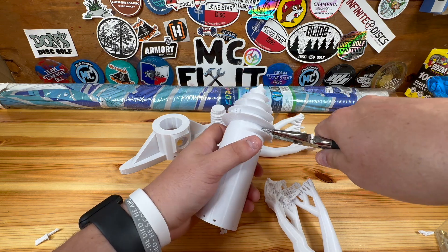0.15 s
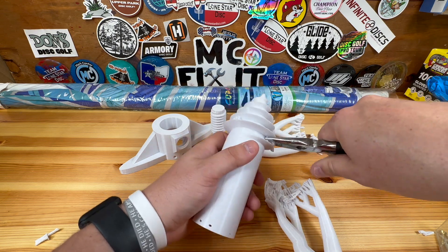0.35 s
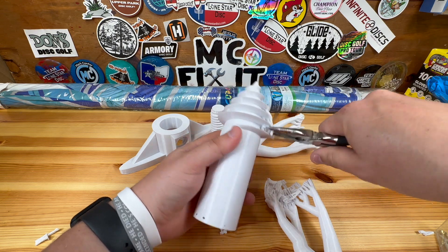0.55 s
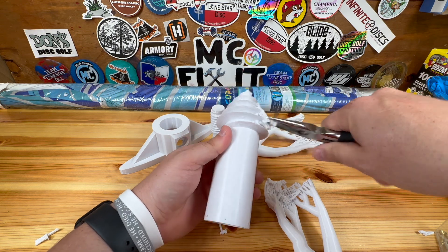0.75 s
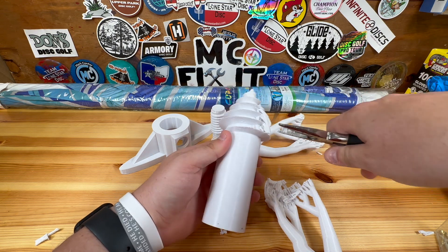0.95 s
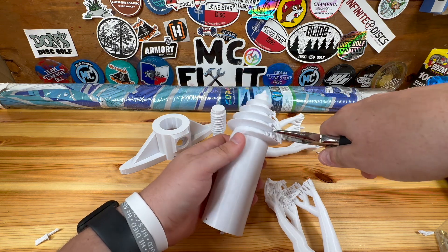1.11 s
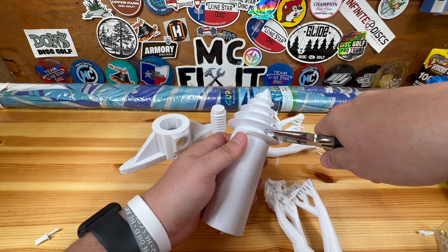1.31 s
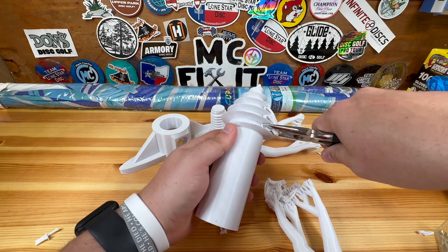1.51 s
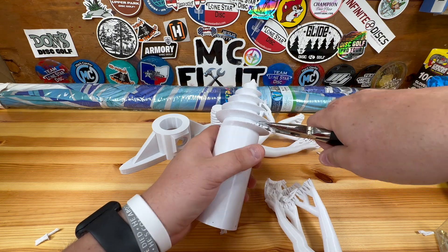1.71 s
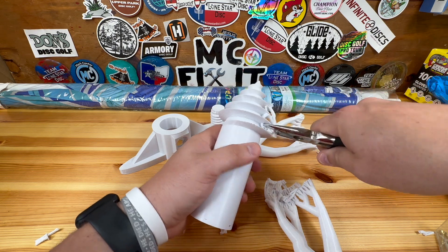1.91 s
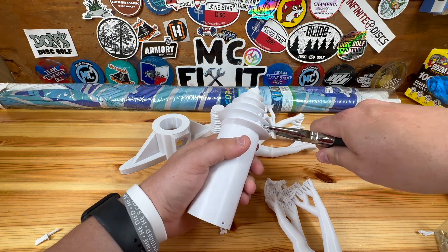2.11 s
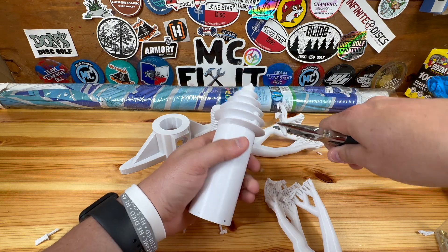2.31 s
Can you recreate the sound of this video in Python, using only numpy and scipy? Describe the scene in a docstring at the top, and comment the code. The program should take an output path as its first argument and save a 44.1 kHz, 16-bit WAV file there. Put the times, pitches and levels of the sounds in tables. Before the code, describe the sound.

Sharp plastic cracking as pliers break stiff supports from a hollow tube, over faint room hum

```python
"""Low room air, a faint wavering hum and a soft rustle of hands and loose struts run throughout, while
pliers grip, twist and snap brittle plastic struts off a hollow printed tube over a wooden bench.
Each crack is a short volley of tiny fractures ringing the tube's stiff walls, while a soft push sets
its air column and the bench going. Hiss, grains and ticks form the rustle; filtered noise is the air,
a wavering sine is the hum, and dying noise sprays are the reflections of the small room."""
import sys
import numpy as np
from scipy import signal
from scipy.fft import rfft, irfft
from scipy.io import wavfile
from scipy.ndimage import uniform_filter1d, map_coordinates

SR = 44100
rng = np.random.default_rng(int(sys.argv[2]) if len(sys.argv) > 2 else 0)


def generate_wav(sig):
    """Save sig (samples, or channels by samples) to the path in sys.argv[1] as 16-bit PCM at SR."""
    pcm = np.round(np.clip(np.atleast_2d(sig).T, -1, 1) * 32767).astype(np.int16)
    wavfile.write(sys.argv[1], SR, pcm)


N = 108045  # samples

# Spectrum of the room air: pitch_hz, relative density_db
AIR_SPECTRUM = [(21, -26), (35, -9.5), (60, -2), (128, -2.5), (240, -11.5), (330, -6.5), (420, -9.5),
                (582, -12), (654, -21), (1170, -25), (1390, -52), (1530, -26.5), (2300, -36.5), (2800, -33),
                (3600, -40), (4680, -56), (7920, -120)]
# Level of the machine hum over time: time_s, level_db
HUM_LEVEL = [(0.0, -57), (0.05, -48.5), (0.16, -70), (0.2, -54.5), (0.76, -60.5), (0.84, -45), (0.95, -70),
             (1.23, -56.5), (1.26, -48.5), (1.43, -67), (1.47, -51), (1.61, -61), (2.02, -56.5),
             (2.45, -59)]
# Level of the rustle over time: time_s, level_db
RUSTLE_LEVEL = [(0, -66.5), (0.06, -69.5), (0.11, -84), (0.175, -88), (0.19, -51), (0.29, -55.5),
                (0.36, -41), (0.42, -44), (0.45, -50), (0.51, -59), (0.55, -48), (0.6, -57), (0.67, -65),
                (0.73, -55), (0.77, -51.5), (0.83, -71), (0.88, -85), (0.965, -79), (0.99, -63.5),
                (1.02, -68), (1.05, -69), (1.13, -65.5), (1.16, -53), (1.19, -48), (1.24, -77),
                (1.285, -59), (1.31, -57), (1.345, -64), (1.39, -43), (1.42, -47), (1.48, -62), (1.53, -58),
                (1.56, -43.5), (1.64, -50), (1.72, -64), (1.76, -58.5), (1.79, -40.5), (1.87, -66),
                (1.92, -45.5), (1.97, -38.5), (2.03, -55), (2.1, -60.5), (2.125, -48), (2.155, -47.5),
                (2.175, -45), (2.195, -51), (2.23, -58.5), (2.3, -65), (2.33, -54.5), (2.41, -76),
                (2.445, -62)]
# Spectrum of the rustling hiss: pitch_hz, relative density_db
RUSTLE_SPECTRUM = [(530, -47), (900, -24.5), (1400, -10.5), (2160, -6), (2970, -6.5), (3750, -5.5),
                   (4090, -4), (6470, -6), (9800, -7.5), (11000, -22.5), (12200, -44), (15000, -80.5),
                   (22000, -120)]
# Cracks, ticks and knocks; the levels are relative, before the trims of each part: start_s,
# snap_db (5.6-7.4 kHz), thud_db (bench), tube_db (air column), low_db (1.2-2.1 kHz),
# mid_db (2-3.1 kHz), high_db (3.8-5.1 kHz), top_db (7.9-10.1 kHz), left_over_right_db, volley_ms
CRACK_EVENTS = [(0.051, -65, -42.5, -50, -60, -90, -72, -73.5, 3.5, 4.7),
                (0.183, -50.5, -70, -44, -39, -61.5, -46.5, -50.5, 1, 0.94),
                (0.201, -48.5, -51.5, -37.5, -59.5, -52, -46.5, -54, 9, 1.3),
                (0.2199, -24, -35, -20.5, -26.5, -32.5, -29.5, -24.5, 1.5, 3.3),
                (0.324, -16, -37, -28, -24.5, -26.5, -23, -18.5, 3.5, 2.7),
                (0.3305, -40.5, -52.5, -35.5, -31.5, -34, -25.5, -35, 2.5, 1.5),
                (0.3736, -25, -33.5, -30, -27.5, -29, -27.5, -17, 4, 2.8),
                (0.379, -18.5, -34.5, -31.5, -27, -23.5, -21, -20, 0, 3),
                (0.3871, -39, -33, -35, -40.5, -52, -38, -55, 11, 3.9),
                (0.3995, -43.5, -56, -41.5, -45, -52, -45.5, -51, -0.5, 3),
                (0.421, -38.5, -67, -66, -56, -69, -51, -52, 10, 1.7),
                (0.4577, -35.5, -69, -66, -53, -64, -49.5, -43, 2, 0.96),
                (0.468, -47, -74, -60, -56, -61, -43.5, -45, -5, 0.99),
                (0.486, -42, -74, -57.5, -56, -52.5, -49, -44, 6.5, 1.7),
                (0.524, -49, -48, -56, -68, -55, -56, -47, -4, 1.1),
                (0.534, -36, -55, -57, -51, -44, -37.5, -34, -2, 2.2),
                (0.5416, -35, -68, -52, -64, -50, -38.5, -42.5, 3.5, 2.5),
                (0.559, -40.5, -45.5, -60, -66, -51, -42.5, -58, 2, 1.7),
                (0.587, -48.5, -52, -59, -75, -56, -48, -52.5, 6, 1.7),
                (0.7571, -47, -44, -54, -53.5, -46.5, -51.5, -59, 0, 4.4),
                (0.974, -49, -64, -69, -59, -48.5, -49, -48, 0, 2.7),
                (1.027, -55, -35.5, -49, -63, -51.5, -64, -62, -1, 3),
                (1.0445, -45.5, -64, -59, -86, -38.5, -44.5, -47.5, 3, 3.1),
                (1.0535, -64, -68, -45.5, -84, -49, -76, -76, -2, 1.1),
                (1.065, -44, -65, -85, -47, -44.5, -53, -55, -3, 1.15),
                (1.099, -56, -76, -73, -66, -51, -53, -67, -2, 2.5),
                (1.1445, -47.5, -59, -52.5, -66, -53.5, -70, -60.5, 1.5, 1.5),
                (1.154, -47, -74, -53, -75, -57, -54.5, -57, 2, 2.3),
                (1.169, -48, -69, -54, -64, -43.5, -57, -60, 3, 2.6),
                (1.1725, -50, -35.5, -44, -57, -44.5, -63, -47, 0, 1.5),
                (1.198, -44, -39, -36, -45, -46.5, -45, -53, 3, 4.1),
                (1.2355, -78, -61, -66.5, -85, -53.5, -76.5, -79, -3, 1.9),
                (1.296, -57, -65, -73, -51, -54, -57, -55.5, -1.5, 1.8),
                (1.306, -47, -75, -57.5, -50, -54, -47, -49.5, 2, 2.9),
                (1.316, -45.5, -61, -76, -57, -52, -46.5, -51, 1, 1.9),
                (1.3507, -38.5, -69, -52, -50, -46, -50, -39, 0.5, 1),
                (1.364, -57, -55, -50, -49.5, -52.5, -52, -52, -2, 5.5),
                (1.372, -26, -77, -47, -49.5, -36.5, -50, -36, -1, 1.5),
                (1.3765, -58, -44, -34.5, -63, -64, -61, -57, 4.5, 2.7),
                (1.387, -57, -75, -56, -40, -47, -41, -40, -3, 3.6),
                (1.3967, -29, -61, -40.5, -41.5, -37.5, -32, -27, 0, 1.7),
                (1.4105, -51.5, -65, -44, -61, -43.5, -49, -55, 4, 1.5),
                (1.421, -24.5, -38, -39, -48, -39, -33, -32, 9.5, 1.7),
                (1.4294, -26, -61, -42, -41, -29.5, -31.5, -24, -11.5, 2.9),
                (1.436, -16.5, -32, -28.5, -26.5, -21.5, -21.5, -24, 3, 1.9),
                (1.4415, -41, -41, -41.5, -55, -48, -37, -50, 9, 2.1),
                (1.446, -50, -47, -35.5, -54, -45, -45, -50, -12, 1.7),
                (1.4515, -49, -56, -55, -66, -52, -55, -59, 0, 1.4),
                (1.5433, -43, -69, -83, -69, -61, -56, -46.5, 5, 2.1),
                (1.5798, -19.5, -38, -27, -29.5, -19, -19, -21, -0.5, 2.53),
                (1.584, -22, -61, -39, -26.5, -34, -32.5, -43, 7.5, 2.14),
                (1.771, -29.5, -66, -40.5, -41.5, -42, -58, -29, -0.5, 1.54),
                (1.782, -38, -67, -51, -50, -43, -38, -42, 9.5, 1.4),
                (1.8072, -18.5, -47, -32, -26.5, -32, -29, -29.5, 1.5, 2.7),
                (1.8161, -20.5, -36, -18.5, -30, -22, -22.5, -28.5, -0.5, 2.17),
                (1.841, -30.5, -69, -70, -58, -38, -34, -33.5, 2, 1.1),
                (1.8525, -41, -61, -42, -70, -56, -53, -46, 9, 2),
                (1.929, -18.5, -36, -24, -22.5, -27, -31, -21.5, 3, 1.7),
                (1.9464, -23, -28.5, -23.5, -43, -25.5, -26, -22, 2, 1.66),
                (1.955, -28, -35, -45, -67, -39, -34, -37, 3, 4.9),
                (1.9792, -33, -44, -70, -52, -48, -33.5, -36, 5.5, 1.7),
                (1.9854, -30, -41, -35, -50, -38, -44, -27.5, 0, 1.9),
                (2.111, -52.5, -63, -63, -73, -72, -73, -59, 9, 2.5),
                (2.1316, -36, -59, -58, -73, -51, -41.5, -44, -1, 2.3),
                (2.145, -32, -71, -65, -63.5, -47, -35.5, -39, 3, 3),
                (2.1531, -45, -61, -77.5, -61, -48, -38, -41, -6, 4.3),
                (2.1615, -32.5, -72, -67, -61, -44, -35.5, -45, 8.5, 3.1),
                (2.1675, -52, -78, -70, -73, -67, -45.5, -48, 11, 3.7),
                (2.1795, -34.5, -70, -58, -54.5, -45, -36, -41.5, 1, 3.7),
                (2.186, -38.5, -68, -67, -61, -41, -38, -48, 13, 2),
                (2.2038, -44, -73, -59.5, -41.5, -45, -38, -40.5, -3.5, 2),
                (2.243, -57, -65, -56, -56, -54, -67, -56.5, 4.5, 2.8),
                (2.314, -49.5, -52, -61, -56.5, -51.5, -52, -52.5, 4, 1.7),
                (2.347, -57, -79, -61, -65, -59, -54, -58, 5, 2.9),
                (2.4225, -42.5, -71, -71, -59, -47.5, -43, -42, 3, 1.7)]
# How the hand holds the tube, each row until the next: from_s, air_pitch_hz, air_ring_length_share,
# lowest_wall_mode_hz, wall_ring_db (for the bands that start under GRIP_UNDER_HZ)
HAND_GRIP = [(0, 693, 0.76, 1350, 3), (.3, 707, 2.3, 1358, -6), (.36, 720.4, 1.03, 1364, -7),
             (.44, 708, 0.88, 1410, -2), (1.0, 690, 0.66, 1307, 11), (1.19, 704, 0.67, 1356, 3),
             (1.34, 685, 1, 1427, 5), (1.376, 540, 0.1, 1420, -3), (1.384, 719, 0.59, 1322, 12),
             (1.425, 695, 0.63, 1840, -3.5), (1.5, 669, 0.44, 1327, -11), (1.7, 726.5, 0.79, 1340, -6),
             (1.9, 650, 0.31, 1323, -7), (1.94, 714, 0.6, 1320, -11), (1.97, 641, 1.1, 1235, -4),
             (2.2, 681, 2.4, 1373, 7), (2.23, 684, 1, 1330, -4)]
# Air column at rest, retuned by the grip in a crack: pitch_hz, relative level_db, t60_s
AIR_MODES = [(718.5, 7, 0.062), (639, -13, 0.058), (488.5, -28, 0.15)]
# Wall modes before detuning (the grip sets the first pitch): pitch_hz, relative level_db, t60_s
WALL_MODES = [(1337.5, -9, 0.088), (1660, -20.5, 0.032), (2330, -4.5, 0.011), (2880, -16, .015),
              (4605, -12.5, 0.015), (5820, -7.5, 0.0071), (6592, -10, 0.018), (6910, -9.5, 0.0046),
              (8190, -16, 0.026), (9300, -14.5, 0.0075), (9730, -14.5, 0.0091)]
# Bench modes: pitch_hz, relative level_db, t60_s
BENCH_MODES = [(318.7, 0, 0.043), (223, -7.5, 0.019), (110, -17.5, 0.042), (67, -8, 0.09)]
# Bands the fractures sound in, lowest first: low_hz, high_hz, gain_db
FRACTURE_BANDS = [(1178, 2060, 6.5), (1960, 3100, 2), (3766, 5096, 1), (5630, 7360, 1), (7900, 10140, 3.5)]
# Dull knock added at the level of the low band: low_hz, high_hz, gain_db
DULL_KNOCK = (417, 1037, -2.8)
# Low reflections of each crack: low_hz, high_hz, level_db, t60_s
LOW_REFLECTIONS = (180, 1900.5, -14.5, 0.09)

AIR_DB, AIR_SIDE, AIR_LEFT_OVER_RIGHT_DB = -56.5, 0.7, 1
HUM_HZ, HUM_WIDTH_HZ = 146.3, 10.2
RUSTLE_FLICKER_DB, RUSTLE_SIDE = 0.5, 0.56
RUSTLE_TUBE_DB = -11  # rubbing also stirs the air in the tube
TICKS_PER_S, TICKS_DB = 500, -8  # loose struts tick within the rustle
CRACK_SPAN = int(SR / 10)  # samples
FRACTURES_PER_S, SCATTER_DB = 6000, 4
ATTACK_MS, ATTACK_SHARE, RELEASE_MS = 0.61, 0.24, 1.7  # longer volleys also swell more slowly
PUSH_MS, PUSH_LATE_MS = 0.39, 2.885
AFTER_DB, AFTER_MS = -14.5, 3.9  # small after-shocks keep jolting the air and the bench
TUBE_TRIM_DB, BENCH_TRIM_DB = 7.5, 2.5
DETUNE = 0.026  # each piece breaks with its wall modes shifted by about this share
MODE_SPREAD_DB, GRIP_UNDER_HZ = 4.5, 3000
NEAR_DB, NEAR_T60_S, NEAR_ABOVE_HZ = -1, 0.029, 2100  # bench and wall reflections
ROOM_DB, ROOM_T60_S, ROOM_ABOVE_HZ = -13.5, 0.13, 1730
RIGHT_LATE_MS = 0.157
CEILING, TOP_HZ = 0.85, 13000


def undb(db):
    """Decibels express amplitude ratios on a logarithmic scale."""
    return 10 ** (np.asarray(db, float) / 20)


def unit(x):
    """Dividing by the root mean square gives a signal unit power."""
    return x / np.sqrt(np.mean(x ** 2))


def band(x, lo_hz, hi_hz):
    """A band-pass filter keeps the energy between two pitches."""
    return signal.sosfilt(signal.butter(2, [lo_hz, hi_hz], "band", fs=SR, output="sos"), x)


def curve(table):
    """Linear interpolation joins (time, level) points into a contour."""
    return np.interp(np.arange(N) / SR, *np.array(table, float).T)


def coloured(table):
    """Spectral shaping: white noise weighted along (pitch, density) points, at unit power."""
    hz, db = np.array(table, float).T
    f = np.fft.rfftfreq(N, 1 / SR) + 1
    weight = undb(np.interp(np.log(f), np.log(hz), db, -60, -60))
    return unit(irfft(rfft(rng.standard_normal(N)) * weight, N))


def walk(rate):
    """Random modulation: levels drawn at a given rate per second, joined by slopes; spread 1."""
    k = int(SR / rate)
    steps = np.repeat(rng.standard_normal(N // k + 1), k)
    return unit(uniform_filter1d(steps, k)[:N])


def rings(x, modes):
    """Modal superposition: damped resonators, each passing about the power of unit noise."""
    out = 0
    for hz, db, t60 in modes:
        r = 10 ** (-60 / 20 / (t60 * SR))
        poles = [1, -2 * r * np.cos(2 * np.pi * hz / SR), r * r]
        out = out + undb(db) * np.sqrt(1 - r) * signal.lfilter([1, 0, -1], poles, x) / 2
    return out


def echoes(x, db, t60, above_hz, under_hz=10950):
    """Diffuse reflection: a dying spray of band-limited noise, different left and right."""
    t = np.arange(min(SR // 2, x.shape[1])) / SR
    tail = band(rng.standard_normal((2, len(t))), above_hz, under_hz) * undb(-60 * t / t60)
    tail = tail / np.sqrt(np.sum(tail ** 2, axis=1, keepdims=True))
    return undb(db) * signal.fftconvolve(x, tail, axes=1)[:, :x.shape[1]]


def background():
    """Broadband noise with a wide stereo part makes the air; frequency modulation wavers the hum."""
    air = coloured(AIR_SPECTRUM) + AIR_SIDE * coloured(AIR_SPECTRUM) * np.array([[1], [-1]])
    balance_db = AIR_LEFT_OVER_RIGHT_DB * np.array([[.5], [-.5]])
    pitch_hz = HUM_HZ + HUM_WIDTH_HZ / 2 * walk(8.1)
    hum = np.sqrt(2) * np.sin(2 * np.pi * np.cumsum(pitch_hz) / SR)
    return undb(AIR_DB + balance_db) * air + undb(curve(HUM_LEVEL)) * hum


def rustle():
    """Friction: skin and struts on plastic give a grainy, partly shared hiss with scattered ticks."""
    grains = undb(RUSTLE_FLICKER_DB * (walk(45) + walk(400)))
    strikes = (rng.random(N) < TICKS_PER_S / SR) * rng.exponential(size=N) ** 1.9
    ticks = signal.lfilter([1], [1, -.95], strikes)
    shape = unit(grains) + undb(TICKS_DB) * unit(ticks)
    sides = np.array([coloured(RUSTLE_SPECTRUM), coloured(RUSTLE_SPECTRUM)])
    hiss = coloured(RUSTLE_SPECTRUM) + RUSTLE_SIDE * sides
    stir = rng.standard_normal((2, N)) + rng.standard_normal(N)
    hiss = hiss + undb(RUSTLE_TUBE_DB) * unit(rings(stir, AIR_MODES))
    return undb(curve(RUSTLE_LEVEL)) * unit(shape * hiss)


def soft_push(ms):
    """Impulsive forcing: a smooth late pulse, then random after-shocks that die away."""
    soft = np.exp(-((ms - PUSH_LATE_MS) / PUSH_MS) ** 2)
    shocks = np.exp(-ms / AFTER_MS) * rng.standard_normal(CRACK_SPAN)
    after = signal.fftconvolve(soft, shocks)[:CRACK_SPAN]
    return soft + undb(AFTER_DB) * after / np.abs(after).max()


def pushed_body(push, modes):
    """Modal excitation: a push sets a body's modes ringing in varying proportion; peak 1."""
    # each mode after the first gets a random strength in every push
    spread = MODE_SPREAD_DB * rng.standard_normal(len(modes)) * (np.arange(len(modes)) > 0)
    x = rings(push, [(hz, db + s, t60) for (hz, db, t60), s in zip(modes, spread)])
    return x / np.abs(x).max()


def fracture_volley(ms, volley_ms):
    """Brittle fracture: random impulses of either sign under a rising, then dying envelope."""
    rise = np.minimum(ms / (ATTACK_MS + ATTACK_SHARE * volley_ms), 1)
    env = rise * np.exp(-np.maximum(ms - volley_ms, 0) / RELEASE_MS)
    breaks = rng.random(CRACK_SPAN) < FRACTURES_PER_S / SR
    size = undb(-SCATTER_DB * np.log(rng.random(CRACK_SPAN)))
    return env * breaks * size * np.sign(rng.standard_normal(CRACK_SPAN)), np.sqrt(np.mean(env ** 2))


def wall_sound(volley, env_rms, band_levels, wall_hz, ring_db):
    """Plate resonance: the volley and its wall ringing, levelled band by band, over a dull knock."""
    shift = rng.standard_normal(len(WALL_MODES))
    wall = [(hz * (1 + DETUNE * s), db, t60) for (hz, db, t60), s in zip(WALL_MODES, shift)]
    wall[0] = (wall_hz, *WALL_MODES[0][1:])
    knock_lo, knock_hi, knock_db = DULL_KNOCK
    sound = undb(band_levels[0] + knock_db) * unit(band(volley, knock_lo, knock_hi)) * env_rms
    for level_db, (lo, hi, gain_db) in zip(band_levels, FRACTURE_BANDS):
        grip_db = ring_db * (lo < GRIP_UNDER_HZ)
        modes = [(hz, db + grip_db, t60) for (hz, db, t60), rest in zip(wall, WALL_MODES)
                 if lo < rest[0] <= hi]
        ringing = band(volley + rings(volley, modes), lo, hi)
        sound = sound + undb(level_db + gain_db) * unit(ringing) * env_rms
    return sound


def cracks():
    """Modal resonance: fractures ring the walls as a soft push drives the tube's air and the bench."""
    ms = np.arange(CRACK_SPAN) * 1000 / SR
    low_hz, high_hz, reflect_db, reflect_t60 = LOW_REFLECTIONS
    out = np.zeros((2, N + CRACK_SPAN))
    for t, snap_db, thud_db, tube_db, low_db, mid_db, high_db, top_db, pan_db, volley_ms in CRACK_EVENTS:
        _, air_hz, share, wall_hz, ring_db = [g for g in HAND_GRIP if g[0] <= t][-1]
        push = soft_push(ms)
        air = [(hz * air_hz / AIR_MODES[0][0], db, t60 * share) for hz, db, t60 in AIR_MODES]
        sound = undb(TUBE_TRIM_DB + tube_db) * pushed_body(push, air)
        sound = sound + undb(BENCH_TRIM_DB + thud_db) * pushed_body(push, BENCH_MODES)
        volley, env_rms = fracture_volley(ms, volley_ms)
        band_levels = (low_db, mid_db, high_db, snap_db, top_db)
        sound = sound + wall_sound(volley, env_rms, band_levels, wall_hz, ring_db)
        sound = undb([[pan_db / 2], [-pan_db / 2]]) * sound
        # each crack gets freshly drawn noise reflections, so no colouring repeats
        low = echoes(sound, reflect_db, reflect_t60, low_hz, high_hz)
        near = echoes(sound, NEAR_DB, NEAR_T60_S, NEAR_ABOVE_HZ)
        at = int(t * SR)
        out[:, at:at + CRACK_SPAN] += sound + low + near
    return out[:, :N]


def room(x):
    """Interchannel delay and reverberation: direct sound is late on the right, and a tail is added."""
    late_right = map_coordinates(x[1], [np.arange(N) - RIGHT_LATE_MS * SR / 1000])
    return np.array([x[0], late_right]) + echoes(x, ROOM_DB, ROOM_T60_S, ROOM_ABOVE_HZ)


def scene():
    """Linear superposition: handling sounds pass through the room and add to the background."""
    return room(cracks() + rustle()) + background()


def record(dry):
    """Soft saturation rounds the loudest peaks; a steep low-pass filter then cuts the top."""
    rounded = CEILING * np.tanh(dry / CEILING)
    return signal.sosfilt(signal.cheby2(10, 70, TOP_HZ, fs=SR, output="sos"), rounded)


dry = scene()
out = record(dry)
generate_wav(out)
```